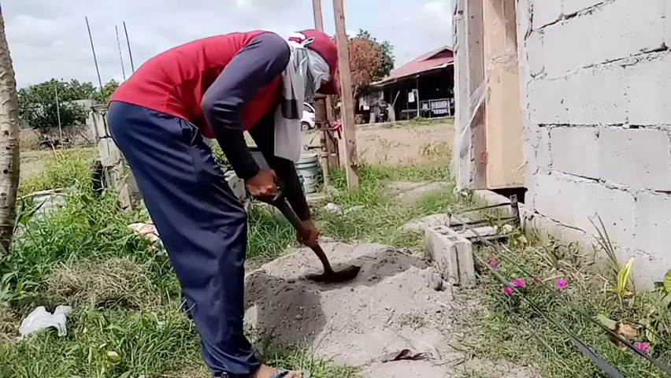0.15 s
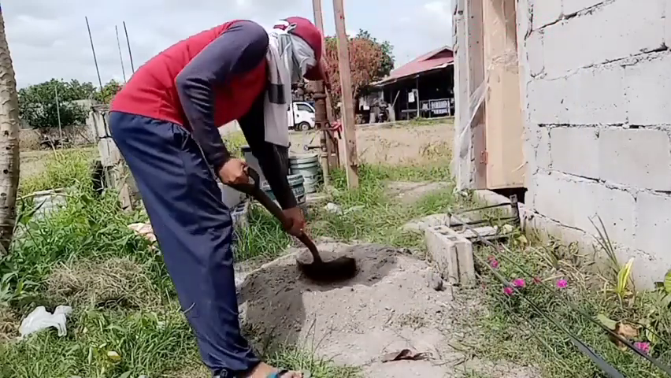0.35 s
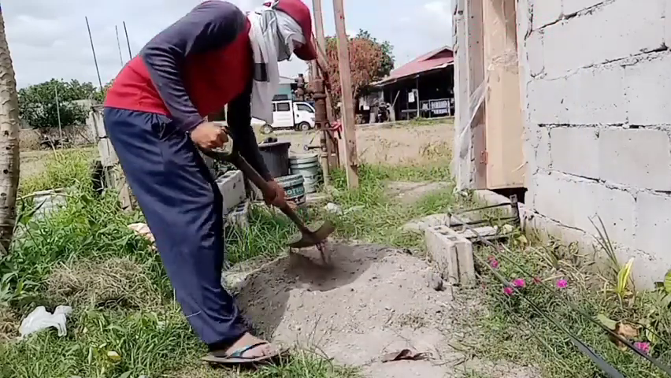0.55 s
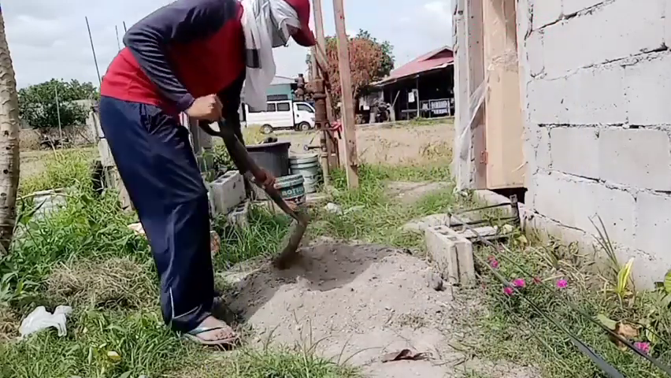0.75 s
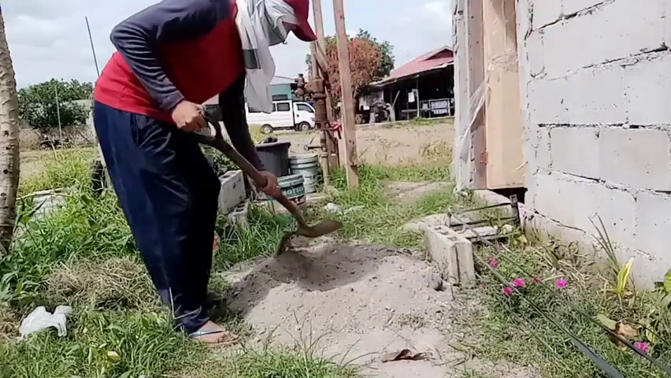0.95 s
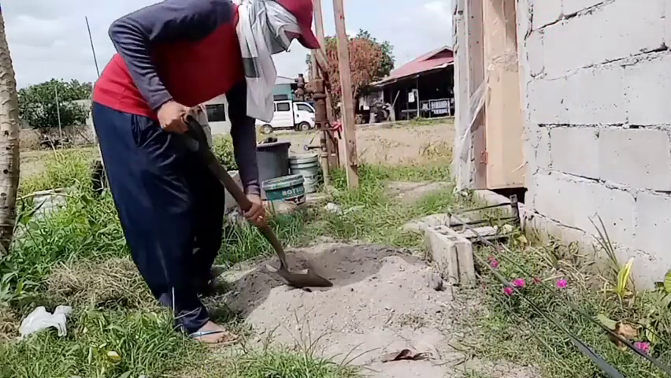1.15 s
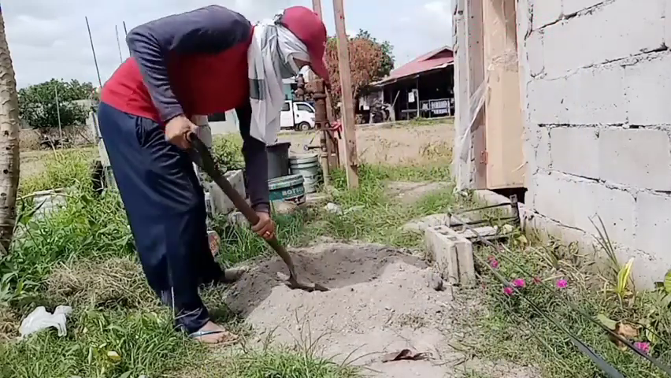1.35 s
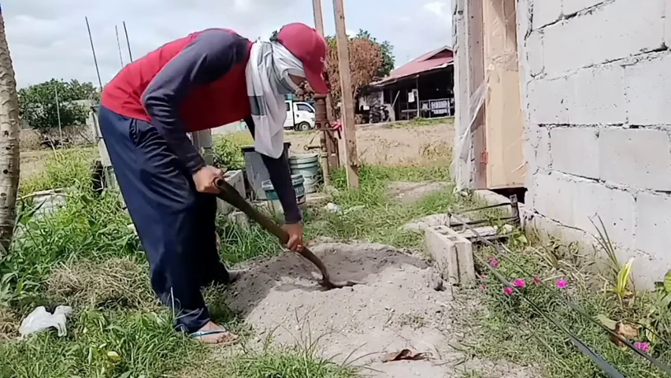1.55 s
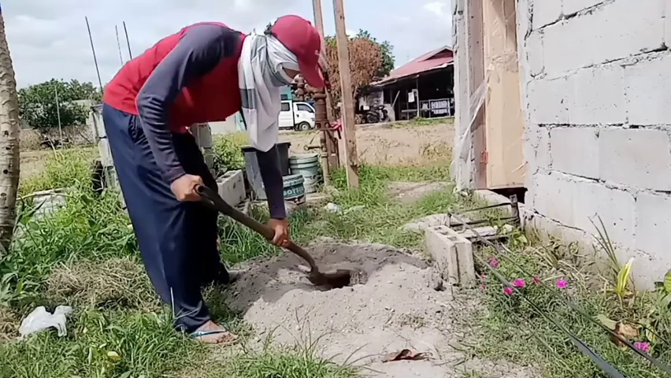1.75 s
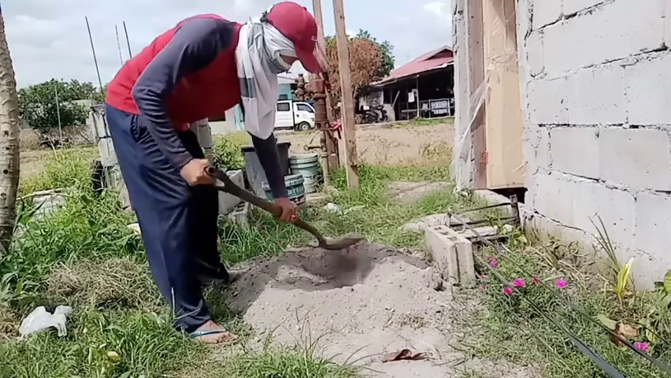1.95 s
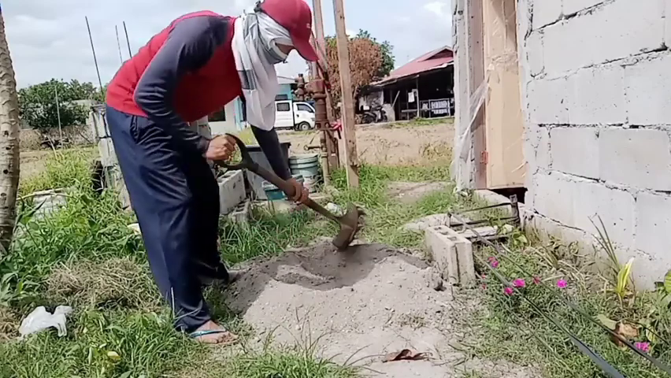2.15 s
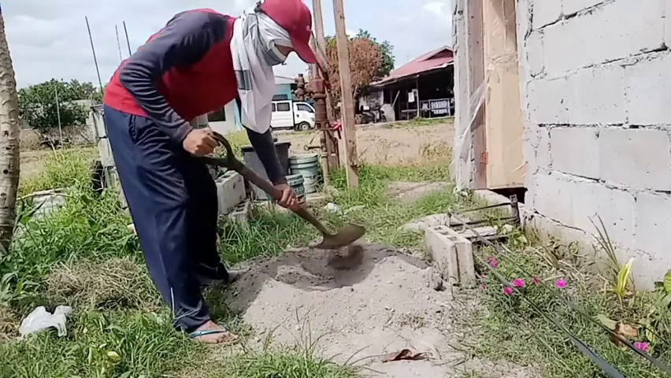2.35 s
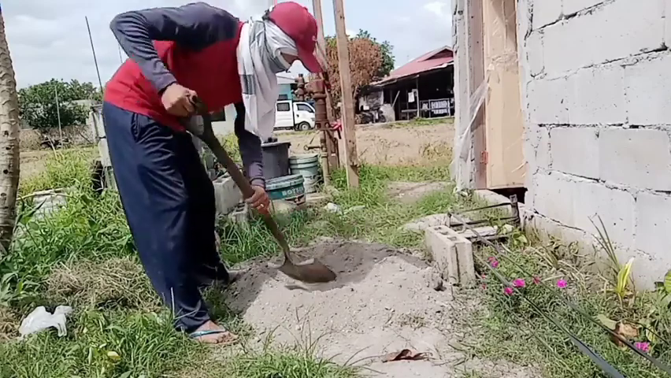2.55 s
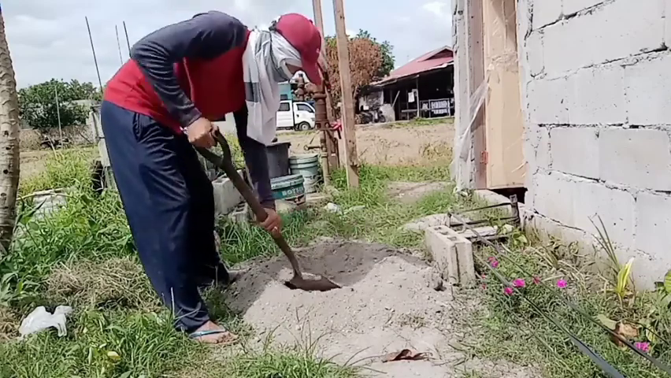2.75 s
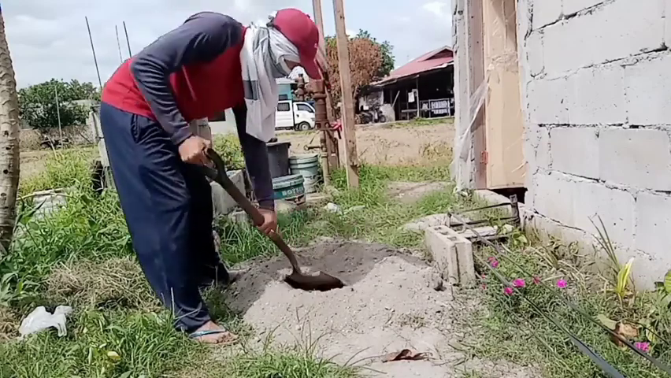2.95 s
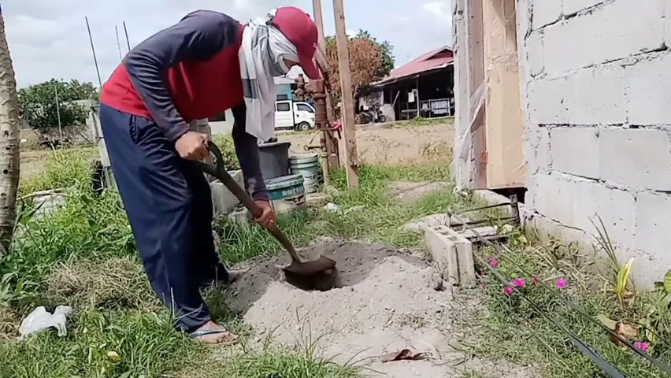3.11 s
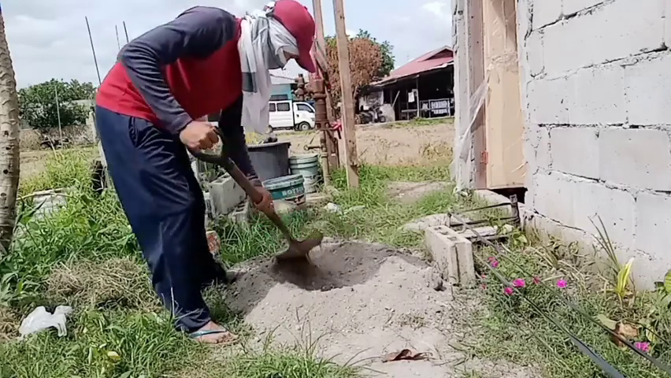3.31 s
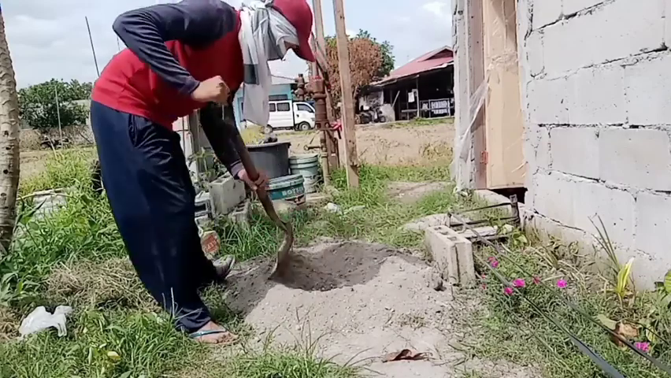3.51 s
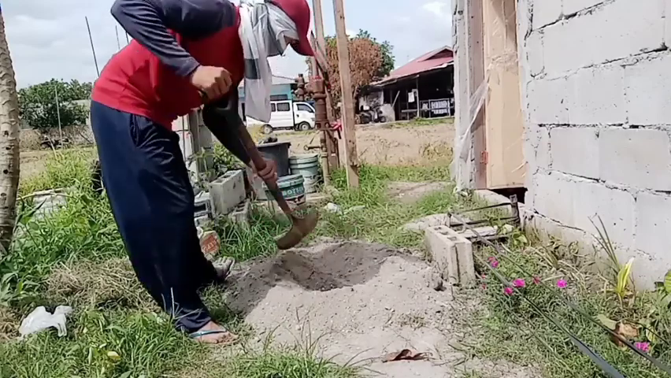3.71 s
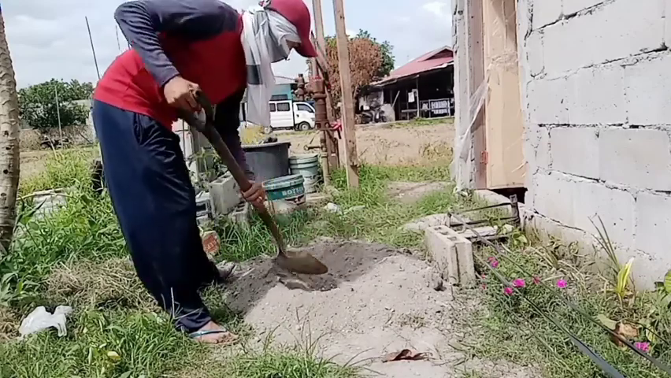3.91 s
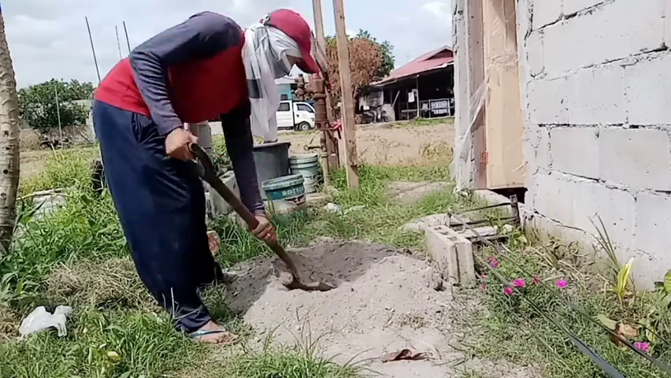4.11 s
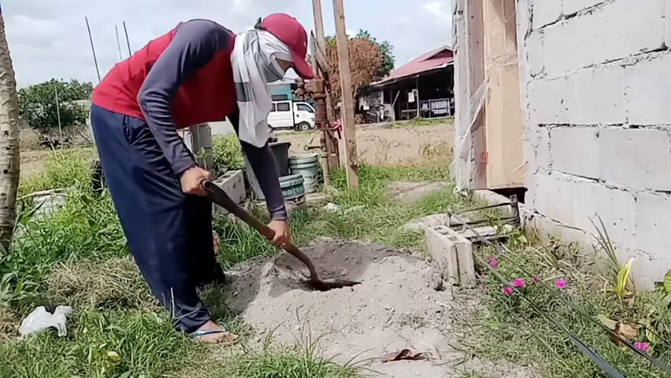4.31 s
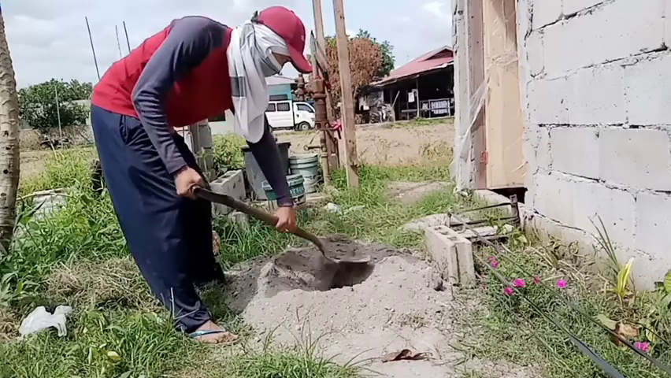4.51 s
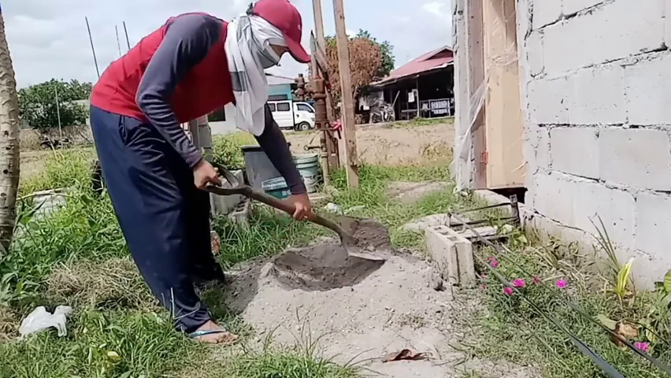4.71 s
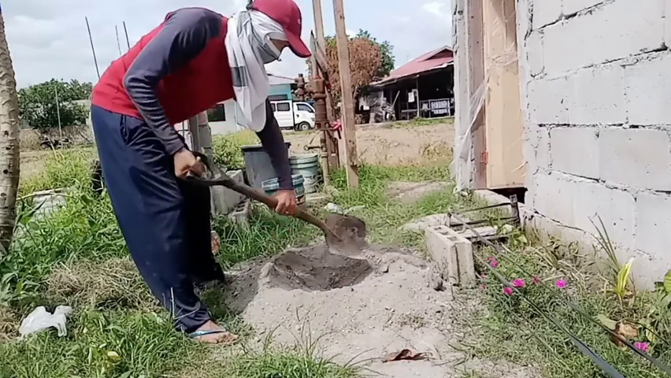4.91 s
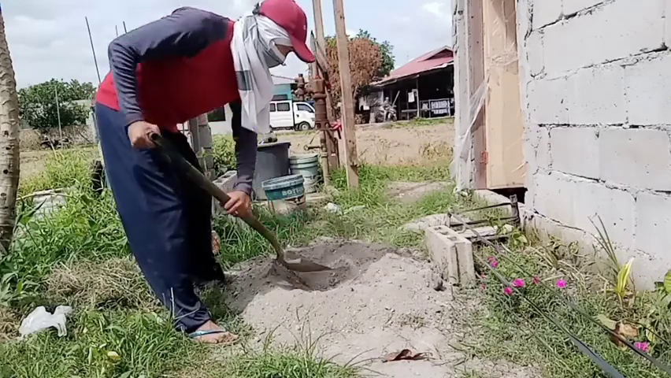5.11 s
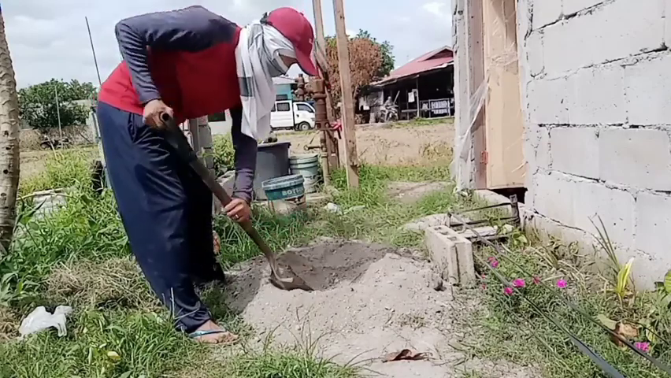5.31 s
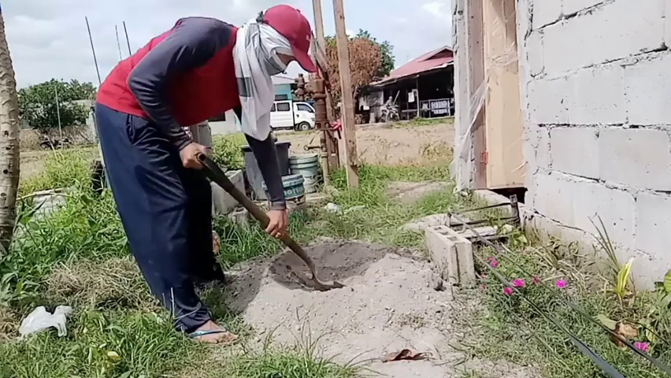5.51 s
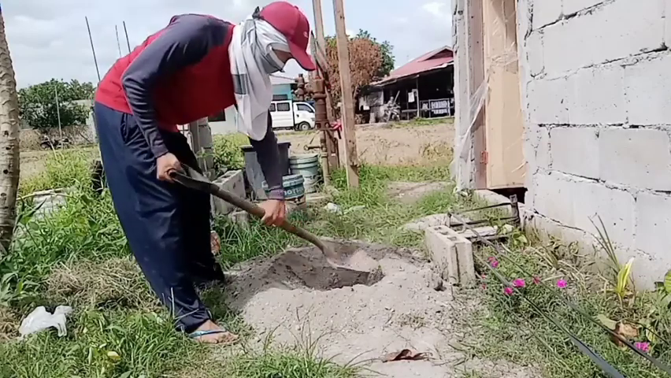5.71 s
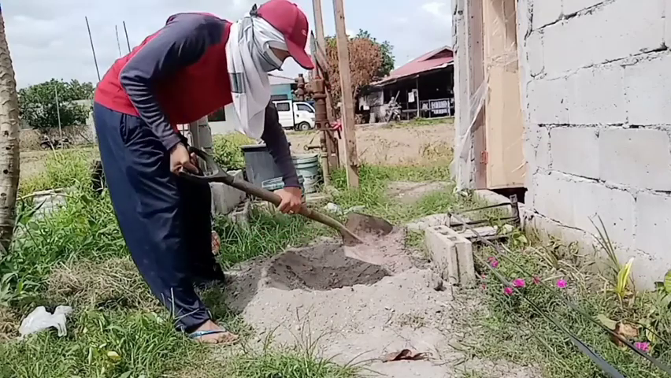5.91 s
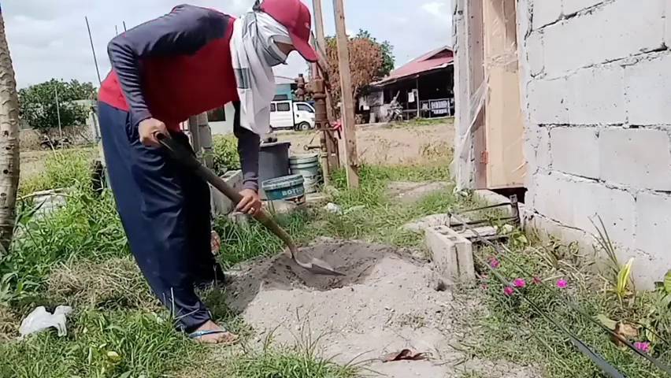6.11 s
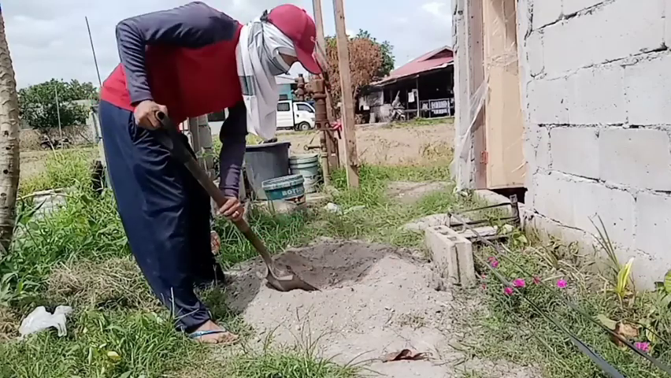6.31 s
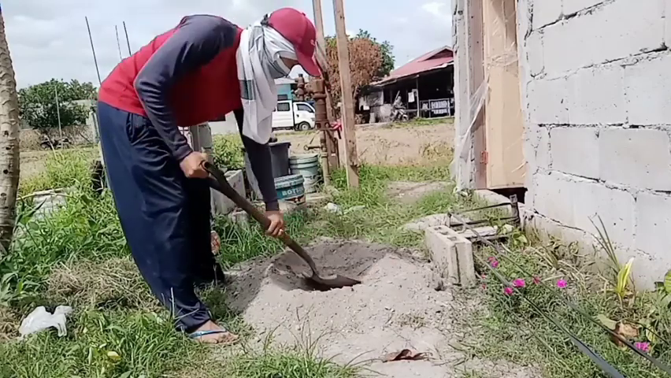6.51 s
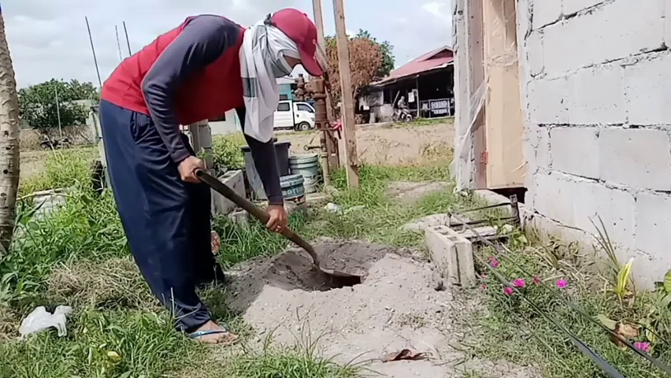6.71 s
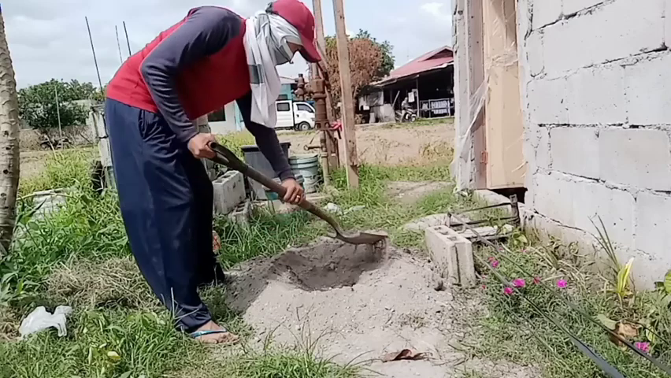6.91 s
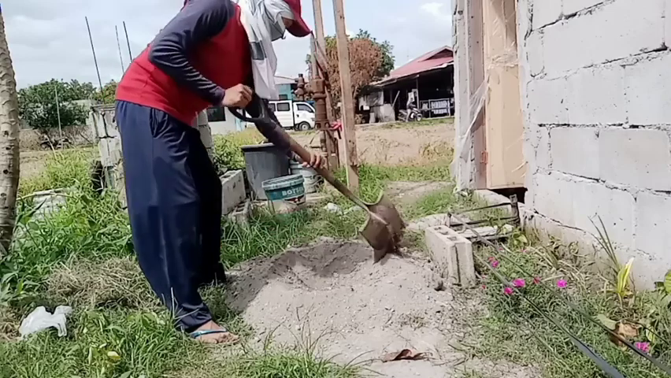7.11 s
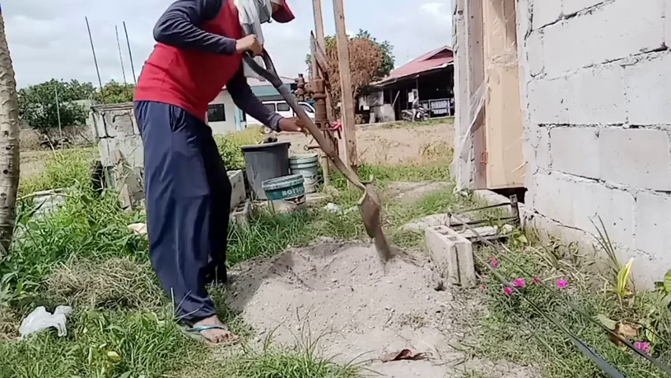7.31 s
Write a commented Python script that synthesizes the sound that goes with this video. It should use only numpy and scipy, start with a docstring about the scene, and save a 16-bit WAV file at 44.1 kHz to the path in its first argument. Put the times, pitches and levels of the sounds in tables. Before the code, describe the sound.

A steel shovel repeatedly crunches and scrapes into a heap of gritty sand, loose grains sliding off between strokes, with a faint engine idling far away.

```python
"""Shovelling sand in a yard

Close to the microphone a steel shovel digs in a heap of sand: the blade lands, scrapes in, lifts, and sand slides off.
Random grain contacts drive the blade's modes, a gritty scrape, a packed-sand thud and a fine hiss; bright clicks tick.
A wall and the ground return weak early copies. Far off an engine idles as a sum of some orders of its cycle,
among faint hums made of narrow noise bands and the yard's hush of coloured noise."""
import sys
import numpy as np
from scipy import signal
from scipy.fft import rfft, irfft, next_fast_len
from scipy.io import wavfile
from scipy.ndimage import uniform_filter1d, map_coordinates

SR = 44100
rng = np.random.default_rng(int(sys.argv[2]) if len(sys.argv) > 2 else 0)


def digitize_waveform(pressure):
    """Quantize a signal to 16-bit integers and store it at the path in sys.argv[1].

    Rows of a 2-D input are taken as channels; values are limited to [-1, 1].
    """
    field = np.atleast_2d(pressure).T
    bounded = np.clip(field, -1, 1)
    quanta = np.round(bounded * 32767).astype(np.int16)
    wavfile.write(sys.argv[1], SR, quanta)


N = 324135

# Strokes into the heap. Each row: landing in seconds, skid level in dB, end of skid in seconds, bite in seconds,
# loaded moment in seconds, its scrape in dB, hardest moment in seconds, its scrape in dB, stop in seconds,
# thud offset in dB.
SHOVEL_STROKES = [(-.3, -40, -.22, -.2, -.1, -35, 0, -32, .085, 0),
                  (1.14, -40, 1.215, 1.255, 1.34, -30, 1.41, -29, 1.485, -1),
                  (2.59, -60, 2.595, 2.615, 2.67, -31, 2.71, -26, 2.812, -3),
                  (3.965, -31, 4.02, 4.03, 4.075, -30, 4.11, -26.5, 4.19, 2),
                  (5.165, -40, 5.18, 5.24, 5.275, -29.5, 5.4, -27, 5.475, -2),
                  (6.22, -38, 6.237, 6.275, 6.31, -33, 6.435, -25, 6.507, 1)]
# Sand sliding between strokes. Each row: start in seconds, fullest moment in seconds, end in seconds,
# slide level in dB, thud relative to the slide in dB, hiss relative to the slide in dB.
SAND_SLIDES = [(.1, .14, .3, -59, -8, -14), (.335, .36, .55, -57, -22, -14), (.45, .8, 1.02, -50, -19, -20),
               (1.5, 1.53, 1.64, -58, -6, -20), (1.6, 1.73, 1.89, -51, -15, -34),
               (1.9, 2.04, 2.2, -55, -20, -21), (2.165, 2.19, 2.46, -50, -24, -21),
               (2.82, 2.93, 3.16, -53, -6, -24), (3.225, 3.25, 3.36, -51, -8, -35),
               (3.36, 3.54, 4.0, -52, -11, -25), (4.2, 4.36, 4.6, -56, -9, -28),
               (4.57, 4.77, 4.98, -48, -25, -24), (5.48, 5.56, 5.8, -59, -14, -24),
               (5.88, 5.94, 6.03, -56, -20, -25), (6.04, 6.12, 6.21, -62, -18, -17),
               (6.52, 6.75, 7.05, -59, -16, -36), (6.93, 7.19, 7.5, -51, -19, -25)]
# Close contacts: blade landings, hard crunches within strokes, knocks and stones on the blade.
# Each row: time in seconds, contact level before trim in dB, ring relative to it before trim in dB,
# best rung mode in Hz.
BLADE_HITS = [(.03, -33, 14, 544), (0.142, -35, -20, 1950), (.862, -36, -14, 2070), (1.1328, -17, -9, 2600),
              (1.2037, -34, -4, 2630), (1.4497, -24, -8, 1690), (2.18, -36, -20, 1710),
              (2.6, -26.5, -14.5, 2500), (2.8098, -27, -3, 1507), (3.235, -43, -12, 1730),
              (3.49, -44, -6, 2070), (3.6207, -43, 4, 1620), (3.9623, -20, -8.5, 2510),
              (4.0941, -14, -11, 1466), (4.1246, -18, -2, 2660), (4.1695, -22, 4, 3340),
              (4.7865, -32, -11, 3150), (4.808, -37, -8, 2520), (4.8535, -38, -7, 2530),
              (5.153, -32, -3, 1940), (5.1627, -24, 3, 2830), (5.3612, -22, -2, 1660),
              (5.3828, -14, 3, 749), (5.913, -45, -9, 2530), (5.9314, -46, -3.5, 2520),
              (6.199, -40, -7, 1750), (6.2177, -17.5, -21, 1650), (6.3, -26, 0, 544),
              (6.385, -18, -10, 1630), (6.4219, -11.5, -2, 2910), (6.6736, -48, -2, 3150),
              (7.0912, -40, -3, 1710), (7.1758, -36, -5.5, 1640), (7.19, -38, -8, 3150),
              (7.2806, -36, -20, 2510)]
# Modes of the free blade. Each row: frequency in Hz, relative level in dB, undamped 60 dB decay in seconds.
BLADE_MODES = [(315, -22, 0.15), (544, -7, 0.059), (749, -7.5, 0.069), (1071, 3.5, 0.091), (1255, -7.5, .1),
               (1490, 7.5, .08), (1644, -1, 0.046), (2070, 2.5, 0.065), (2510.4, 2.5, .2), (2708, 4, .08),
               (2980, -12, 0.057), (3158, 4.5, 0.067), (3430, -6.5, 0.045), (3740, -0.5, 0.067),
               (4090, -13, 0.016), (4520, -25, 0.061), (6300, -35, 0.08), (7210, -20, 0.1),
               (8450, -25, 0.082)]
# Colour of the gritty scrape. Each row: frequency in Hz, relative density in dB per Hz.
GRIT_COLOUR = [(470, -26), (800, -18.5), (1060, -2.5), (1350, -5), (1600, -2), (1810, 0), (3020, 1.5),
               (4110, -3.5), (5600, -34.5), (7280, -45), (12300, -120)]
# Colour of the packed sand's thud. Each row: frequency in Hz, relative density in dB per Hz.
THUD_COLOUR = [(76, -50), (130, -13.5), (303, -2.5), (620, -4), (742, -7), (1000, -13), (1300, -14),
               (2200, -120)]
# Colour of the fine grains' hiss. Each row: frequency in Hz, relative density in dB per Hz.
HISS_COLOUR = [(2940, -26), (5000, -5), (5760, -14), (6290, -3), (7640, -10.5), (8460, -7), (10800, -20),
               (14900, -13), (16000, -20.5)]
# Far engine's idle. Each row: time in seconds, frequency of the fourth order in Hz, its level before wavering in dB.
ENGINE_IDLE = [(0.0, 49.1, -60), (0.59, 49.1, -60), (0.71, 53.1, -54.5), (3.32, 53.3, -54.5),
               (4.22, 56.7, -57), (4.36, 54.6, -60.5), (4.83, 53.2, -54.5), (5.8, 52.5, -59.5),
               (6.43, 53.1, -49.5), (7.35, 53.3, -56)]
# Upper engine orders. Each row: order of the cycle as a number, relative level in dB.
EXHAUST_ORDERS = [(5, -18), (6, 4.5), (7, -8), (8, 2.5), (9, -9), (10, 2.5), (11, 1), (12, -4.5),
                  (13, -15.5), (14, -7.5), (15, -34)]
# Colour of the engine's rumble. Each row: frequency in Hz, relative density in dB per Hz.
RUMBLE_COLOUR = [(21, -37), (35, -15), (102, 13), (204, -18.5), (237, -24.5), (300, -20), (390, -79),
                 (660, -120)]
# Colour of the open yard. Each row: frequency in Hz, relative density in dB per Hz.
HUSH_COLOUR = [(120, -18), (200, 2.5), (311, -15.5), (601, -25), (1530, -9.5), (1650, -8), (2330, -16),
               (3310, -11), (5130, -38), (8420, -42), (16000, -45)]
# Faint hums in the yard, and one short low band (474 Hz, 3.22 to 3.29 s) that gives the contact at 3.235 s its
# body. # Each row: start in seconds, end in seconds, centre in Hz, level before trim in dB.
YARD_HUMS = [(0.51, .65, 376.4, -63), (0.755, 0.81, 496, -66), (0.875, 0.942, 415, -67.5),
             (1.73, 1.878, 450, -68), (1.956, 2.12, 428, -67.5), (3.01, 3.194, 718, -70),
             (3.22, 3.29, 474, -62), (3.42, 3.94, 433, -63), (3.55, 4.3, 62.4, -62),
             (5.04, 5.136, 878, -69.5), (5.825, 5.897, 717, -68)]
# Bright clicks, some on top of a blade contact. Each row: time in seconds, level before trim in dB.
BRIGHT_CLICKS = [(0.3386, -60), (0.8625, -44), (2.1802, -50), (2.3521, -59), (3.7477, -52.5),
                 (4.5306, -61.5), (4.783, -51), (5.915, -60), (7.1733, -61)]

TOP_HZ = 15800  # upper band limit
SKID_DB_PER_S, LIFT_DB, LIFT_S = -100, -16, .025  # the skid fades, then the blade hops clear
BITE_DB, STOP_DB = -12, -12  # scrape relative to its hardest at those moments
RELEASE_S, RELEASE_DB, SETTLE_S, SETTLE_DB = .033, -30, .11, -47  # after the stop, relative to the hardest
SHALLOW_DB, DEEP_DB, SETTLING_DB = -15, -3, 5  # added to the thud offset at the bite, the stop and at rest
EDGE_DB = -11  # a slide begins and ends this far under its fullest
TRICKLE_DB = -66  # a thin trickle never stops
CRUNCH_T60, FREE_THUD_DB = .05, -30  # seconds; thud relative to crunch for a contact on the blade in the air
UPPER_DB = -56.5  # mean level of the upper engine orders together


def amp(db):
    """Decibels to an amplitude factor."""
    return 10 ** (np.asarray(db) / 20)


def unit(x):
    """x scaled to an RMS of one."""
    return x / np.sqrt(np.mean(x ** 2) + 1e-20)


def curves(rows):
    """One value per sample for each column after the time."""
    times, *columns = np.transpose(rows)
    return [np.interp(np.arange(N) / SR, times, c) for c in columns]


def wobble(rate):
    """A smooth random curve with rate knots a second."""
    knots = rng.standard_normal(int(N * rate / SR) + 4)
    return map_coordinates(knots, [np.arange(N) * rate / SR])


def filtered(x, response):
    """x passed through a complex response of frequency."""
    m = next_fast_len(N + SR // 2)  # spare length lets the ringing die away
    spectrum = rfft(x, m) * response(np.fft.rfftfreq(m, 1 / SR))
    return irfft(spectrum, m)[..., :N]


def colour(points):
    """Gain through (Hz, dB) points on a log frequency axis."""
    f, db = np.transpose(points)
    return lambda hz: amp(np.interp(np.log(hz + 1), np.log(f + 1), db))


def patchy(x, depth_db):
    """Random gain in patches of time and frequency, so the colour shifts from moment to moment."""
    z = signal.stft(x, nperseg=512)[2]
    across_hz = uniform_filter1d(rng.standard_normal(z.shape), size=3, axis=0)
    field = uniform_filter1d(across_hz, size=6, axis=1)
    return unit(signal.istft(z * amp(depth_db * unit(field)), nperseg=512)[1][:N])


def grains(share, spread_db, clump_db, patchy_db):
    """Sand contacts on a share of the samples, some larger than the rest, coming in clumps."""
    sizes = amp(spread_db * rng.standard_normal(N)) * rng.standard_normal(N)
    contacts = sizes * (rng.random(N) < share)
    clumps = amp(clump_db * wobble(120) + clump_db * wobble(35))
    return patchy(contacts * clumps, patchy_db)


def blade(damping):
    """Response of the steel blade as a sum of resonances; more damping widens every mode."""
    hz, db, t60 = np.transpose(BLADE_MODES)
    gains = amp(db) * (-1) ** np.arange(len(hz))
    widths = np.log(1000) / np.pi / t60 * damping
    return lambda f: sum(g * 1j * f * w / (c * c - f * f + 1j * f * w) for c, g, w in zip(hz, gains, widths))


def played(tables, contacts, damping, ring_db, fade_s):
    """Contacts drive steel, packed sand and hiss; the tables give the three levels and add in power."""
    grit = unit(filtered(contacts, colour(GRIT_COLOUR)))
    ring = unit(filtered(contacts, blade(damping)))
    thud = amp(3 * wobble(22)) * filtered(contacts, colour(THUD_COLOUR))
    hiss = filtered(contacts, colour(HISS_COLOUR))
    layers = [unit(grit + amp(ring_db) * ring), unit(thud), unit(hiss)]
    power, t = np.zeros((3, N)), np.arange(N) / SR
    for rows in tables:
        level_db, thud_db, hiss_db = curves(rows)
        inside_s = np.minimum(t - rows[0][0], rows[-1][0] - t)
        gate = np.clip(inside_s / fade_s + .5, 0, 1)
        power += (gate * amp([level_db, level_db + thud_db, level_db + hiss_db])) ** 2
    return np.sum(np.sqrt(power) * layers, axis=0)


def stroke(lands, skid_db, skid_end, bites, loaded, loaded_db, hardest, top_db, stops, thud_db):
    """One stroke through skid, hop, push and stop, as rows of time, scrape level and thud relative to scrape."""
    faded_db = skid_db + SKID_DB_PER_S * (skid_end - lands)
    hop = min(skid_end + LIFT_S, (skid_end + bites) / 2)
    hop_db = faded_db + LIFT_DB * (hop - skid_end) / LIFT_S
    times = [lands, skid_end, hop, bites, loaded, hardest, stops, stops + RELEASE_S, stops + SETTLE_S]
    from_hardest_db = top_db + np.array([0, STOP_DB, RELEASE_DB, SETTLE_DB])
    levels = [skid_db, faded_db, hop_db, top_db + BITE_DB, loaded_db, *from_hardest_db]
    # the thud grows as the blade digs in
    thuds = thud_db + np.interp(times, [bites, stops, times[-1]], [SHALLOW_DB, DEEP_DB, SETTLING_DB])
    return np.transpose([times, levels, thuds])


def strokes(hiss_db):
    """Close scrapes: dense grains under load drive the blade, damped by the sand on it."""
    tables = [[(s, db, thud_db, hiss_db) for s, db, thud_db in stroke(*row)] for row in SHOVEL_STROKES]
    contacts = grains(share=.6, spread_db=3, clump_db=.9, patchy_db=2.4)
    return played(tables, contacts, damping=1.18, ring_db=-1, fade_s=.0033)


def slides():
    """Loose grains run over the freer blade; each slide swells and thins out above a constant trickle."""
    tables = []
    for start, full, end, db, thud_db, hiss_db in SAND_SLIDES:
        swell = [(start, EDGE_DB), (full, 0), (end, EDGE_DB)]
        tables.append([(s, db + edge_db, thud_db, hiss_db) for s, edge_db in swell])
    tables.append([(s, TRICKLE_DB, -22, -30) for s in (-1, N / SR + 1)])
    contacts = grains(share=.15, spread_db=3.5, clump_db=1.1, patchy_db=2.5)
    return played(tables, contacts, damping=0.65, ring_db=-4.5, fade_s=.03)


def engine():
    """Far idle: uneven firings give the fourth to fifteenth orders of the cycle, each wavering; the fourth booms."""
    boom_hz, boom_db = curves(ENGINE_IDLE)
    cycle = 2 * np.pi * np.cumsum(boom_hz / 4) / SR
    boom = np.sqrt(2) * np.cos(4 * cycle + .6 * wobble(6)) * amp(2.5 * wobble(5))
    upper = sum(amp(db + 3.46 * wobble(4)) * np.cos(k * cycle + .5 * wobble(4)) for k, db in EXHAUST_ORDERS)
    rumble = unit(filtered(rng.standard_normal(N), colour(RUMBLE_COLOUR))) * amp(2.5 * wobble(14))
    return amp(boom_db) * boom + amp(UPPER_DB + 1.5 * wobble(2.5)) * (unit(upper) + rumble)


def yard():
    """The far hush of the open air: coloured noise of slowly wandering level."""
    noise = patchy(rng.standard_normal(N), depth_db=5)
    return amp(-63.5 + wobble(2.68)) * unit(filtered(noise, colour(HUSH_COLOUR)))


def hits():
    """Each close contact crushes a short burst of grains and rings the blade, most of all near its best mode."""
    out, t = np.zeros(N + SR), np.arange(SR // 5) / SR
    noise = grains(share=.5, spread_db=3, clump_db=1.26, patchy_db=2.5)
    colours = (GRIT_COLOUR, THUD_COLOUR, HISS_COLOUR)
    crunch, thud, hiss = (unit(filtered(noise, colour(points))) for points in colours)
    hz, db, t60 = (c[:, None] for c in np.transpose(BLADE_MODES))
    digs = [stroke(*row) for row in SHOVEL_STROKES]
    for k, (s, peak_db, ring_db, best_hz) in enumerate(BLADE_HITS):
        draw = rng.standard_normal((2, len(BLADE_MODES), 1))  # mode levels and phases
        favour_db = 14 * np.exp(-(np.log(hz / best_hz) / 0.036) ** 2) + 3 * draw[0]
        # from just before landing until the stop, sand around the blade chokes its ring
        buried = [rows for rows in digs if rows[0, 0] < s + 1 / 30 and s < rows[-3, 0]]
        thud_db = np.interp(s, buried[0][:, 0], buried[0][:, 2]) if buried else FREE_THUD_DB
        decay_db = -60 * t / t60 * (3 if buried else 1.05)
        ring = np.sum(amp(db + favour_db + decay_db) * np.sin(2 * np.pi * hz * t + 2 * draw[1]), 0)
        grit = (crunch + amp(thud_db) * thud + amp(-21) * hiss)[k * len(t):][:len(t)]
        burst = grit * amp(-60 * t / CRUNCH_T60)
        rise = 1 - np.exp(-t / (0.0052 if buried else .0025))
        contact = rise * (burst + amp(ring_db - 7.5) * ring)
        out[round((s - .002) * SR):][:len(t)] += amp(peak_db - 2) * contact
    for s, peak_db in BRIGHT_CLICKS:
        start = round(s * SR)
        out[start:][:len(t)] += amp(peak_db - 7.5 - 60 * t / 0.074) * np.roll(hiss, start)[:len(t)]
    return out[:N]


def hums():
    """Faint narrow bands of noise, each a randomly modulated tone that swells and fades."""
    t, out = np.arange(N) / SR, np.zeros(N)
    for start, end, hz, db in YARD_HUMS:
        swell = np.sin(np.pi * np.clip((t - start) / (end - start), 0, 1)) ** 0.68
        turn = 2 * np.pi * hz * t
        band = (0.22 + wobble(0.24 * hz)) * np.cos(turn) + wobble(0.17 * hz) * np.sin(turn)
        out += amp(db + 3.5) * swell * band
    return out


def wall(x):
    """A block wall and the ground return a few weak early copies."""
    echoes = [(.004, -30), (.009, -17.5), (.017, -17.5), (.026, -24)]  # delay in seconds, level in dB
    return x + sum(amp(db) * np.pad(x, (round(s * SR), 0))[:N] for s, db in echoes)


def scene():
    """Shovel and sand near the wall; engine, hums and hush far off."""
    shovel = strokes(hiss_db=-21) + slides() + hits()
    return (wall(shovel) + engine() + hums() + yard())[None]


def record(dry):
    """The camera's microphone channel keeps nothing above its band limit."""
    return filtered(dry, lambda hz: hz < TOP_HZ)


dry = scene()
out = record(dry)
digitize_waveform(out)
```